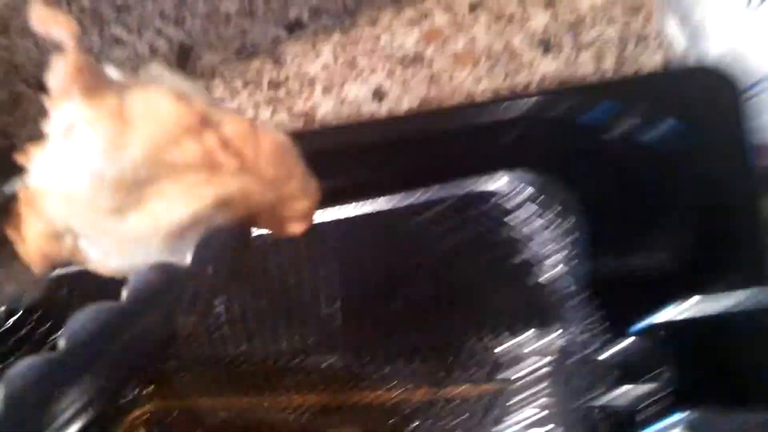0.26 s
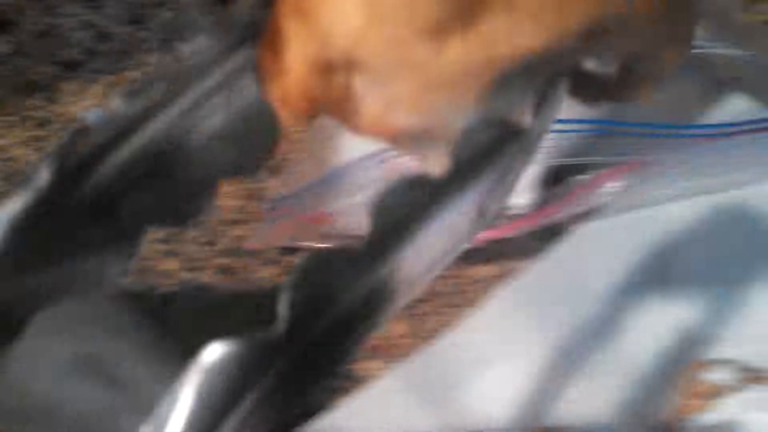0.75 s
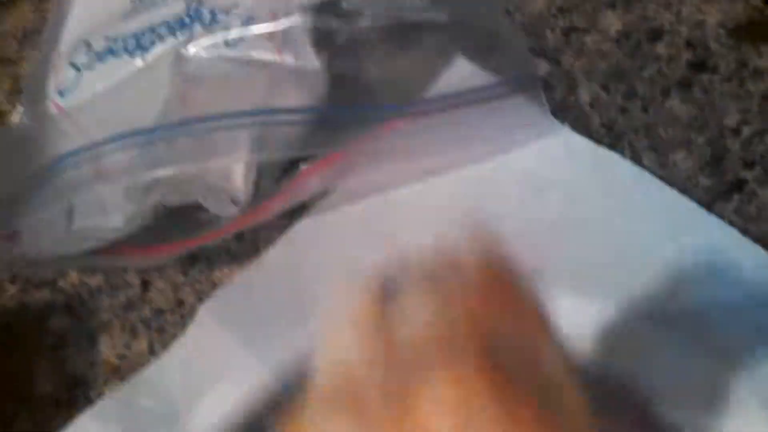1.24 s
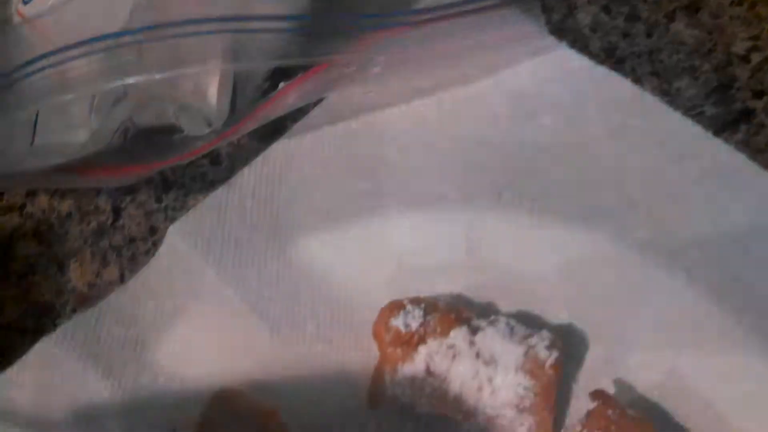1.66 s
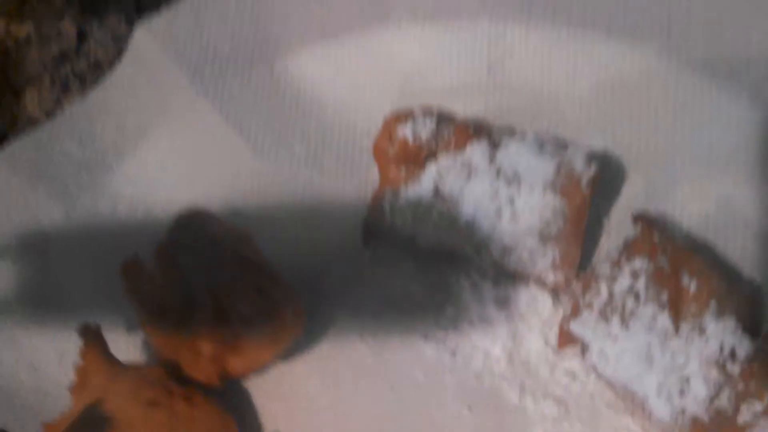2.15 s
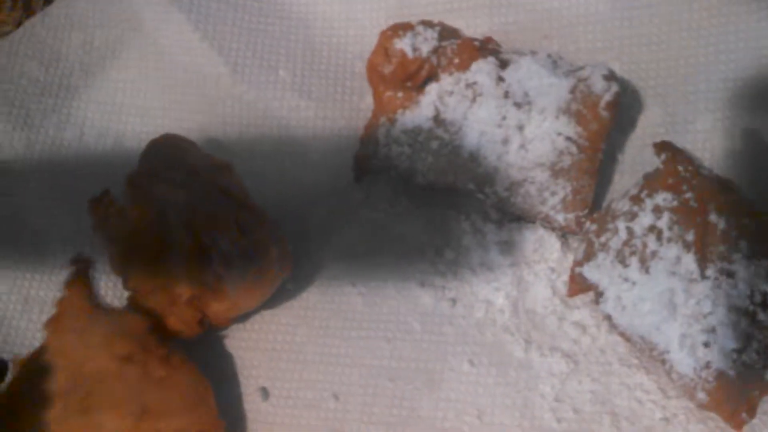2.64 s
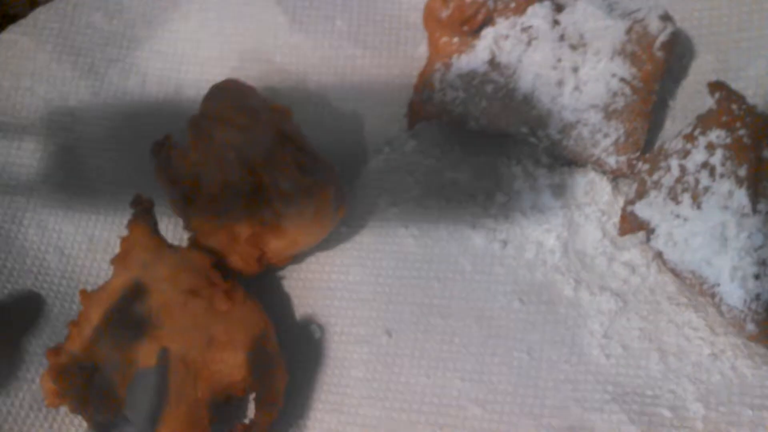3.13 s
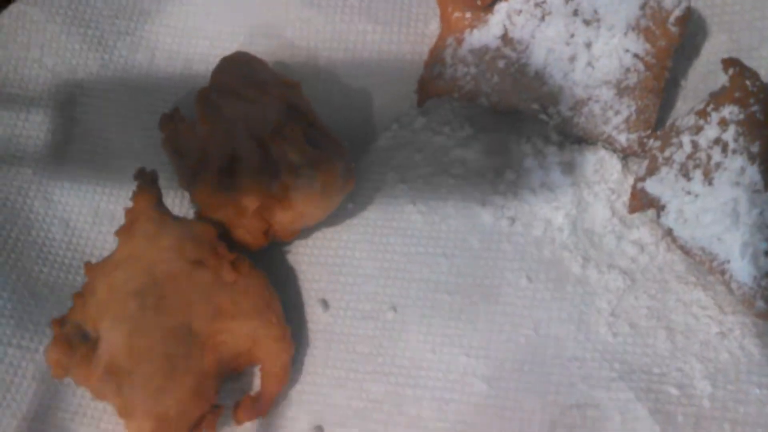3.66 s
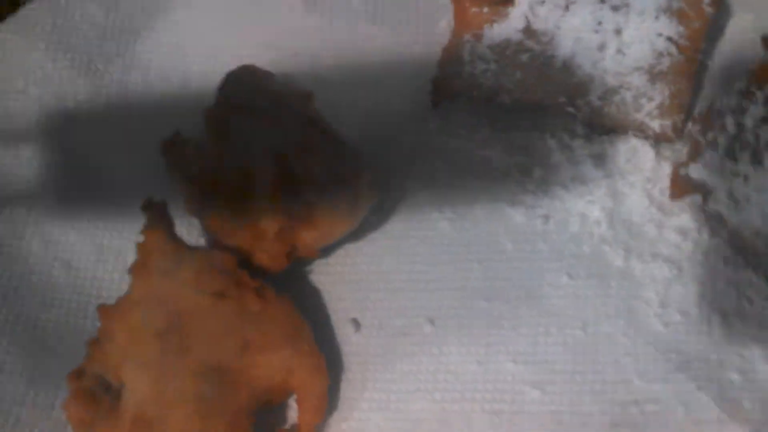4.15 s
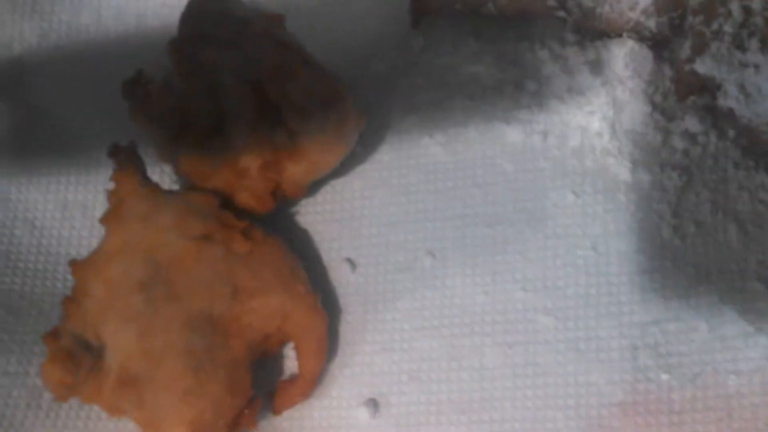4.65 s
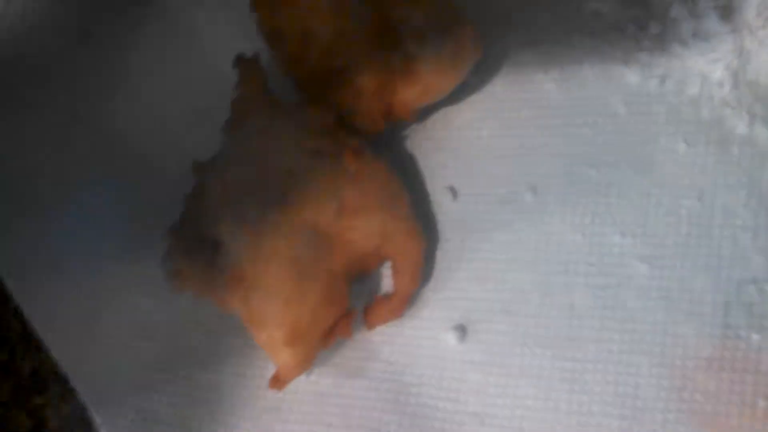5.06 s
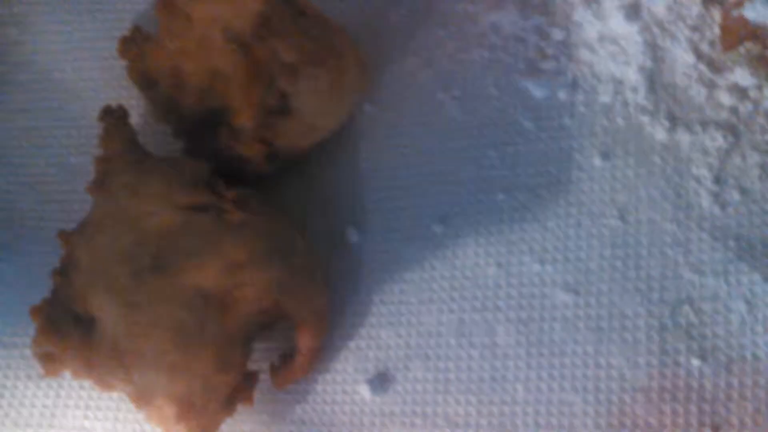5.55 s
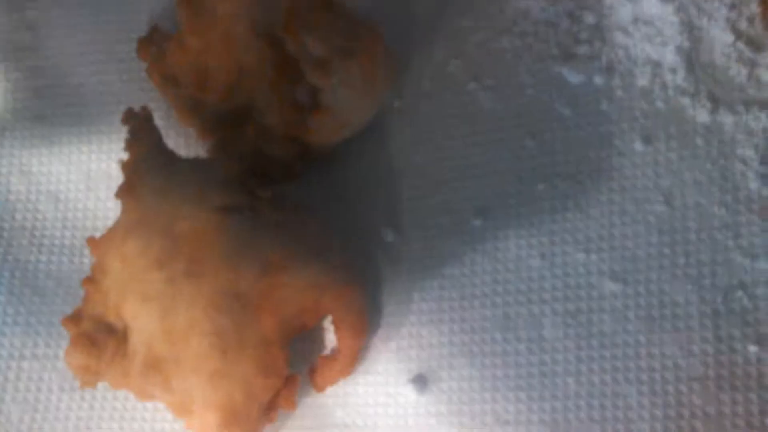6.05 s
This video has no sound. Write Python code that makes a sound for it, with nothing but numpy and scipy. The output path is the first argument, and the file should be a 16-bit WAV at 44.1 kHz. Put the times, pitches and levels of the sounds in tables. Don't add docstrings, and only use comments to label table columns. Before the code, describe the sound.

Metal kitchen tongs tap and scrape lightly on a towel-covered counter, clink sharply three times, then a paper towel rustles and drags in a small kitchen.

```python
import sys
import numpy as np
from scipy import signal
from scipy.fft import rfft, irfft
from scipy.io import wavfile
from scipy.ndimage import uniform_filter1d

SR = 44100
rng = np.random.default_rng(int(sys.argv[2]) if len(sys.argv) > 2 else 0)


def wrap_up_sound(samples):
    columns = np.atleast_2d(samples).T
    tamed = np.clip(columns, -1, 1)
    steps = np.round(tamed * 32767).astype(np.int16)
    wavfile.write(sys.argv[1], SR, steps)


def decibels_to_gain(level_db):
    exponent = np.asarray(level_db, float) / 20
    return 10 ** exponent


N = 277830

# f/Hz, density/dB per Hz
KITCHEN_SPECTRUM = [(25, -118), (55, -65), (75, -69), (150, -69), (260, -74.5), (430, -79), (700, -89),
                    (1200, -95), (2700, -98), (5500, -103), (7500, -105), (15000, -106)]
# t/s, level/dB
BACKGROUND_LIFT = [(0.0, 2.5), (0.77, 4.5), (1.56, 0), (2.02, 4), (2.54, 3.5), (2.808, 2), (3.718, 2.5),
                   (4.35, 5.5), (4.65, 9), (4.91, -1), (5.16, 0.5), (5.51, 6.5), (5.7, 7.5), (5.96, 20),
                   (6.3, 17)]
# f/Hz, correlation/0-1, phase lead/rad
DIFFUSE_LIKENESS = [(50, 0.86, -0.03), (150, 0.9, 0.06), (263, 0.83, -0.12), (440, 0.69, 0.08),
                    (636, 0.61, -0.5), (1050, 0.63, 0.9), (2200, 0, -3.5)]
# f/Hz, t60/s
ROOM_T60 = [(150, 0.71), (1000, 0.28), (3200, 0.42), (5000, 0.46), (8000, 0.36), (12000, 0.2),
            (15000, 0.052)]

# t/s, peak level/dB, f/Hz
FAT_SPITS = [(0.0772, -46, 3660), (0.125, -45, 4590), (0.173, -40, 4930), (0.2887, -33.5, 6800),
             (0.315, -40, 6740), (0.402, -42, 4090), (0.498, -45, 7020), (0.5422, -40.5, 6440),
             (0.599, -34, 7140), (0.6542, -47, 4300), (0.669, -43, 3950), (.681, -42, 5000),
             (.578, -47, 5000), (.065, -44, 9000), (0.721, -40, 3820), (0.7896, -44, 4240),
             (1.1077, -43, 3940), (1.369, -49, 6550), (1.619, -43, 6650)]

# start/s, length/s, level/dB, band start f/Hz, band end f/Hz
SLIDE_EVENTS = [
    (0.849, 0.29, -51.5, 1481, 1457),
    (4.031, 0.087, -51, 1350, 967),
]
# f/Hz, level/dB
SLIDE_SPECTRUM = [(900, 0), (2000, -1.5), (3800, 0), (5000, 0.5), (8000, -4.5), (10000, -11), (15000, -14)]

# t/s, peak level/dB, f/Hz, rise/ms, decay/ms
COUNTER_KNOCKS = [(0.359, -45, 670, 10, 20), (.47, -41, 196, 13, 13), (0.49, -43, 90, 7.6, 9.8),
                  (0.507, -37, 150, 2.9, 6.1), (0.363, -42, 210, 8.5, 23), (1.999, -35, 253, 1.7, 10),
                  (2.681, -33.5, 161, 2.1, 11.5), (4.155, -35.5, 140, 9, 23), (4.114, -36, 209, 6, 16),
                  (4.125, -40, 300, 6, 12), (4.18, -43, 320, 11, 20), (4.2, -41, 150, 8, 15),
                  (4.475, -25, 313, 1, 15.4), (4.72, -34.5, 285, 13, 14), (5.589, -39, 132, 9.8, 21)]
# f/ratio to thud, level/dB, t60/s
COUNTER_MODES = [(.55, -3.5, 0.017), (1.02, 4, 0.012), (1.9, -6, 0.014)]
# t/s, snap level/dB, thud level/dB, snap centre f/Hz,
# thud f/Hz
TIP_TAPS = [(0.3631, -69, -44, 1500, 214), (1.5508, -48, -55.5, 1520, 1000), (1.705, -50, -55, 6860, 440),
            (1.8592, -39, -60, 2920, 310), (1.9108, -43, -48, 2970, 600), (1.9145, -41, -54, 1500, 700),
            (1.951, -41, -56, 7490, 670), (1.9628, -35, -50, 2120, 500), (1.9956, -28.5, -33.5, 1580, 352),
            (2.0111, -32, -35.5, 1530, 486), (2.3555, -39.5, -40.5, 1620, 320),
            (2.3836, -37, -40, 1490, 1074), (2.3838, -43, -70, 7000, 400), (2.483, -42, -70, 9300, 400),
            (2.4032, -35.5, -48, 7000, 370), (2.4837, -46, -58, 4100, 409), (2.494, -41.5, -74, 3420, 229),
            (2.5433, -44, -65, 6700, 253), (2.6275, -43, -44, 1590, 390), (2.681, -30, -47.5, 1570, 160),
            (2.7197, -40.5, -49, 1580, 410), (3.2997, -48, -47, 1970, 338),
            (3.3725, -32.5, -37.5, 1970, 242), (3.4004, -38, -34.5, 2270, 380),
            (3.5801, -37.5, -36.5, 2050, 365), (4.368, -33, -47, 3920, 203),
            (4.7162, -31, -32.5, 1300, 298), (1.894, -39, -56, 1090, 550), (2.3945, -42, -59, 1305, 990),
            (4.3682, -36, -70, 12500, 400), (4.6825, -28, -73, 11500, 400), (2.6812, -31, -70, 7500, 400)]
# t/s, snap level/dB, thud
# level/dB, snap centre f/Hz, thud f/Hz
HARD_TICKS = [(1.9652, -38, -60, 5000, 500), (1.9408, -38, -52, 3000, 700), (1.9215, -42, -56, 3500, 700),
              (1.9108, -36, -70, 2500, 600), (1.8595, -40, -70, 3500, 600), (1.951, -40, -56, 1500, 900),
              (1.982, -41, -56, 1800, 800), (2.5015, -41, -56, 2000, 800), (2.3945, -40, -50, 1200, 990),
              (2.716, -41, -70, 4500, 600), (4.6822, -24, -70, 9500, 600), (4.6845, -25, -70, 12000, 600),
              (4.475, -34, -70, 11000, 600), (5.611, -30, -50, 4000, 900), (5.632, -29, -46, 3000, 900),
              (5.879, -35, -48, 1500, 800), (6.07, -37, -50, 1500, 800), (6.125, -35, -48, 1800, 800),
              (6.152, -37, -50, 1500, 700)]
# t/s, peak level/dB, f/Hz, t60/s
SHORT_PINGS = [(1.712, -44, 1235, 0.32), (1.706, -48, 7100, .05), (1.952, -41, 7500, 0.07),
               (1.951, -51, 9200, 0.03), (1.964, -36, 2100, 0.013), (1.705, -54, 3650, 0.065),
               (2.011, -46, 2730, .015), (2.5, -50, 2150, .06), (2.495, -39, 5600, .04),
               (2.545, -46, 5700, 0.039), (2.66, -54, 3860, 0.1), (2.68, -40, 2220, 0.018),
               (3.3, -43.5, 1970, 0.018), (3.373, -41, 1970, 0.034), (3.1, -50, 1930, 0.033),
               (5.776, -29, 4570, 0.044), (6.189, -27.5, 865, 0.004), (5.5, -43, 810, 0.0092),
               (4.7165, -25.5, 1020, 0.011), (4.7165, -30, 510, 0.014), (4.683, -35, 11800, 0.046),
               (4.683, -33, 9400, .03), (4.683, -54, 9000, .3), (3.7, -30, 10800, .01),
               (4.474, -42, 12200, .02), (4.474, -41, 11500, .02), (4.474, -45, 7050, 0.23),
               (4.474, -40, 4410, .12), (4.116, -38, 12400, .04), (4.116, -39, 13100, .03),
               (2.0015, -36, 500, .012), (4.1335, -22, 225, .04), (4.158, -37, 170, .04),
               (4.472, -30, 110, .05)]

# t/s, snap level/dB, thud level/dB, snap centre f/Hz, thud f/Hz
TOWEL_FOLDS = [(5.466, -52, -54, 1590, 231), (5.5182, -45, -39.5, 1810, 296), (5.5838, -19, -32, 2470, 820),
               (5.6053, -25, -43, 1900, 565), (5.6282, -46, -36.5, 4330, 960),
               (5.6654, -35, -34, 1710, 374), (5.7758, -29, -56, 4600, 984), (5.795, -28, -60, 4600, 900),
               (5.804, -28, -60, 4700, 900), (6.2598, -33, -70, 12500, 600), (6.048, -39, -43, 1500, 800),
               (5.8035, -41, -42, 1530, 1180), (5.9166, -57, -41, 1610, 555), (5.942, -38, -46, 1540, 575),
               (5.983, -24, -45.5, 4140, 1090), (5.9932, -32, -42, 3770, 925), (6.1, -31, -45, 1520, 540),
               (6.1889, -29, -49, 1740, 840), (6.2222, -23, -43.5, 1690, 505),
               (6.2595, -25.5, -43, 1800, 910), (6.2742, -22.5, -42, 6400, 328),
               (5.486, -37, -55, 3520, 600), (6.297, -28.5, -43, 1800, 710),
               (5.7803, -26.5, -47, 4700, 910), (5.7548, -45, -58, 7000, 800), (5.848, -35, -58, 4430, 910),
               (5.898, -41, -44, 4080, 900), (5.472, -44, -68.5, 12500, 600), (5.484, -43, -70, 12500, 600),
               (5.5835, -36, -70, 12600, 600), (5.637, -32, -64, 9030, 600)]
# start/s, length/s, hardest point/share 0-1, body level/dB, fizz over body/dB
TOWEL_STROKES = [(1.701, 0.017, 0.44, -51, 11), (1.71, .09, 0.12, -51, -8), (1.855, 0.071, 0.84, -42, -11),
                 (1.92, 0.15, 0.6, -45, -0.5), (2.353, 0.053, 0.73, -43.5, -4.5),
                 (2.402, 0.066, 0.6, -47.5, -6.5), (2.487, 0.063, 0.09, -43.5, -2),
                 (2.649, 0.054, 0.6, -44, 0), (2.695, 0.073, 0.28, -44, -3), (3.364, 0.02, 0.63, -39.5, -1),
                 (3.399, 0.035, 0, -55.5, 10.5), (3.739, 0.27, 0.65, -50.5, -8),
                 (4.011, 0.14, 0.73, -43, -12.5), (4.371, 0.087, .03, -42.5, -1.5),
                 (5.455, 0.2, 0.38, -41, -5.5), (5.593, 0.055, 0.84, -28.5, -1),
                 (5.581, .014, 0.5, -20, -9.5), (5.645, 0.071, 0.1, -37, -10)]
# t/s, level/dB
TOWEL_DRAG = [(5.7, -80), (5.755, -48.5), (5.778, -32.5), (5.808, -32), (5.82, -38), (5.9, -41.5),
              (6.03, -43), (6.1, -37), (6.25, -43), (6.265, -36), (6.3, -48)]
# f/Hz, level/dB
TOWEL_BODY = [(120, -6), (300, 9.5), (600, 6.5), (1200, 6.5), (2300, -1), (3200, -23)]
# f/Hz, level/dB
TOWEL_FIZZ = [(1500, -48), (2200, 2), (3200, 3), (4500, 0.5), (5200, 4.5), (5800, 2), (8000, 1),
              (15000, -7)]

# t/s, peak level/dB, crack level/dB, crack centre f/Hz, side/factor on capsule lag
ARM_CLINKS = [
    (4.115, -17, -5.5, 4470, 1),
    (4.4722, -8, -11, 2150, 0.81),
    (4.6822, -9.5, -12.5, 4230, 0.94),
]
# f/Hz, level/dB, t60/s
ARM_MODES = [
    [(800, -11, 0.055), (2190, -0.5, 0.039), (3200, -1.5, 0.037), (3660, -1, 0.03), (3940, -0.5, 0.059),
     (4400, 6, 0.026), (4730, -1, 0.036), (4860, -7, .07), (5750, -7, .06), (7130, -2, 0.037),
     (7940, 1, 0.03), (9030, 1, 0.025), (9630, -7, .05), (11600, -4, .03)],
    [(514, -2.5, 0.05), (361, -2, 0.045), (700, 1, 0.057), (1098, 5.5, 0.035), (1260, 0.5, 0.052),
     (1530, -7, 0.093), (2156, 5, 0.075), (3130, -4, 0.059), (3920, -3.5, 0.08), (4190, 0.5, 0.032),
     (4840, -5, 0.12), (6200, -17, 0.04), (7010, -6.5, 0.042), (9220, -10.5, 0.032)],
    [(300, -7, 0.03), (1110, 0.5, 0.013), (2130, -12.5, 0.069), (3190, 7.5, 0.04), (3410, -10, .04),
     (3690, -17, 0.45), (3600, -5.5, 0.03), (4090, -7, 0.02), (5700, -1, 0.042), (4600, -19, .3),
     (6180, -9.5, .08), (6510, -3, 0.025), (7200, -5, 0.043), (8900, -11, 0.056)],
]
# level/dB, centre f/Hz, decay/ms
ARM_SHIVER = [
    (-25, 5000, 30),
    (-29, 6000, 40),
    (-21, 5800, 55),
]

# f/Hz, right capsule lag/rad, right level/dB
PHONE_SHADOW = [(101, -0.39, 4.5), (253, 0.2, 2), (450, 0.78, 4), (660, 1.42, 3.5), (1180, 0.92, -3),
                (1900, 0.21, -7), (2700, -0.41, 9.5), (3990, 0.72, 1), (7500, 0.8, 3), (14500, 0.75, 8.5)]
# f/Hz, level/dB
CAPSULE_RESPONSE = [(20, -21), (45, 0.5), (8200, -3.5), (9400, -11), (10600, -17), (11800, -11.5),
                    (15300, -11.5), (15650, -33), (16700, -48)]
# f/Hz, level/dB
BAND_GATE = [(1000, -30), (2700, -16.5), (5500, -16), (8300, -10), (10500, -3), (14000, -4.5)]


def read(points, hz, column=1):
    table = np.transpose(points)
    return np.interp(np.log(hz + 1), np.log(table[0] + 1), table[column])


def evened(x):
    return x / np.sqrt(np.mean(x ** 2) + 1e-20)


def add(mix, start_s, sound):
    part = mix[round(start_s * SR):][:len(sound)]
    part += sound[:len(part)]


def coloured(x, points):
    return irfft(rfft(x) * decibels_to_gain(read(points, np.fft.rfftfreq(N, 1 / SR))), N)


def snap(hz, ms, width=0.6, rise_ms=0.21, order=1):
    t_s = np.arange(SR // 4) / SR
    f_hz = np.fft.rfftfreq(len(t_s), 1 / SR) + 1
    band = (1 + (np.log2(f_hz / hz) / width) ** 2) ** order
    noise = irfft(rfft(rng.standard_normal(len(t_s))) / band, len(t_s))
    x = noise * np.exp(-t_s * 1000 / ms) * np.minimum(t_s * 1000 / rise_ms, 1)
    return x / abs(x).max()


def ring(modes, split, size=SR // 4):
    t_s = np.arange(size) / SR
    hz, db, t60_s = np.transpose(modes)[:, :, None, None]
    detune = split * np.array([[0], [1], [1]]) * rng.standard_normal((len(modes), 3, 1))
    weaker = decibels_to_gain([[0], [-7], [-7]])
    partials = weaker * decibels_to_gain(db - 60 * t_s / t60_s) * np.sin(2 * np.pi * hz * (1 + detune) * t_s)
    x = partials.sum((0, 1)) * np.minimum(t_s / 0.00081, 1)
    return x / abs(x).max()


def diffuse(pair):
    left, other = rfft(pair, axis=1)
    hz = np.fft.rfftfreq(pair.shape[1], 1 / SR)
    same = np.clip(read(DIFFUSE_LIKENESS, hz), 0, 1)
    turned = np.exp(-1j * read(DIFFUSE_LIKENESS, hz, column=2)) * left
    right = same * turned + np.sqrt(1 - same ** 2) * other
    return irfft(np.array([left, right]), pair.shape[1], axis=1)


def capsules(x, side):
    hz = np.fft.rfftfreq(N, 1 / SR)
    lag = np.exp(-1j * side * read(PHONE_SHADOW, hz))
    shade = decibels_to_gain(read(PHONE_SHADOW, hz, column=2)) * lag
    return np.array([x, irfft(rfft(x) * shade, N)])


def kitchen():
    air = coloured(diffuse(rng.standard_normal((2, N))), KITCHEN_SPECTRUM) * np.sqrt(SR / 2)
    hum = signal.sosfiltfilt(signal.butter(2, 900, fs=SR, output="sos"), air)
    lift_db = np.interp(np.arange(N) / SR, *np.transpose(BACKGROUND_LIFT))
    hum_lift_db = np.minimum(0.97 * lift_db, 4.5)
    return hum * decibels_to_gain(hum_lift_db) + (air - hum) * decibels_to_gain(lift_db)


def room(x):
    echoes = np.zeros((2, SR // 2))
    at = np.arange(100, SR // 2 - 20, 20) + rng.integers(0, 20, (2, (SR // 2 - 101) // 20))
    np.put_along_axis(echoes, at, rng.choice([-1., 1.], at.shape), 1)
    hz, t_s, z = signal.stft(diffuse(echoes), SR, nperseg=256)
    decay = decibels_to_gain(-60 * t_s / read(ROOM_T60, hz)[:, None])
    tail = signal.istft(z * decay, SR, nperseg=256)[1]
    return signal.fftconvolve(x[None], tail / np.linalg.norm(tail[0]), axes=1)[:, :N]


def spitting_fat():
    out = np.zeros(N)
    for s, db, hz in FAT_SPITS:
        add(out, s, decibels_to_gain(db - 1.0) * snap(0.97 * hz, ms=1.0, width=1.0, rise_ms=0.079))
    sizzle_per_s, sizzle_db, fryer_left_s = 42, -42, 1.5
    for when, size, pitch in rng.random((round(sizzle_per_s * fryer_left_s), 3)):
        drop = snap(5000 * (1 + 2 * pitch), ms=0.71, rise_ms=0.1)
        add(out, when * fryer_left_s, size * decibels_to_gain(sizzle_db) * drop)
    return out


def sliding():
    band_db, width_hz, lean = -0.5, 540, 0.58
    out = np.zeros(N)
    hiss = evened(coloured(rng.standard_normal(N), SLIDE_SPECTRUM))
    for start_s, length_s, db, from_hz, to_hz in SLIDE_EVENTS:
        u = np.arange(0, length_s, 1 / SR) / length_s
        r = np.exp(-np.pi * width_hz / SR)
        slow = signal.lfilter([1 - r], [1, -r], rng.standard_normal((len(u), 2)) @ [1, 1j])
        centre_hz = from_hz + (to_hz - from_hz) * u
        band = (slow * np.exp(2j * np.pi * np.cumsum(centre_hz) / SR)).real
        scrape = hiss[round(start_s * SR):][:len(u)] + decibels_to_gain(band_db) * evened(band)
        swell = abs(np.sin(np.pi * u ** lean)) ** 0.81
        add(out, start_s, decibels_to_gain(db) * swell * scrape)
    return out


def knocks():
    out = np.zeros(N)
    for s, db, hz, rise_ms, ms in COUNTER_KNOCKS:
        add(out, s, decibels_to_gain(db + 6.0) * snap(hz, ms, width=0.57, rise_ms=rise_ms, order=2))
    return out


def touches(events, snap_ms):
    out = np.zeros(N)
    for s, snap_db, thud_db, snap_hz, thud_hz in events:
        add(out, s, decibels_to_gain(snap_db + 2) * snap(snap_hz, snap_ms))
        modes = np.multiply(COUNTER_MODES, [thud_hz, 1, 1])
        add(out, s, decibels_to_gain(thud_db + 13.5) * ring(modes, split=0.1, size=SR // 16))
    return out


def pings():
    out = np.zeros(N)
    for s, db, hz, t60_s in SHORT_PINGS:
        add(out, s, decibels_to_gain(db) * ring([(hz, 0, t60_s)], split=0.0116))
    return out


def pressure():
    landing_db, lifting_db, blunt, drag_fizz_db = -7.5, -18, 0.91, -3
    t_s = np.arange(N) / SR
    drag = decibels_to_gain(np.interp(t_s, *np.transpose(TOWEL_DRAG))) * (t_s > TOWEL_DRAG[0][0])
    out = np.array([drag, drag * decibels_to_gain(drag_fizz_db)])
    for start_s, length_s, hardest, db, fizz_db in TOWEL_STROKES:
        u = (t_s - start_s) / length_s
        top = np.clip(hardest, .01, .99)
        rise_db = landing_db * abs(1 - u / top) ** blunt
        fall_db = lifting_db * abs((u - top) / (1 - top)) ** blunt
        ease_db = np.where(u < top, rise_db, fall_db)
        out += decibels_to_gain(db + ease_db) * decibels_to_gain([[0], [fizz_db]]) * (u > 0) * (u < 1)
    return uniform_filter1d(out, size=90, axis=1)


def patchy(x, depth_db):
    z = signal.stft(x, nperseg=256)[2]
    blotches = uniform_filter1d(rng.standard_normal(z.shape), size=6, axis=0)
    blotches = uniform_filter1d(blotches, size=9, axis=1)
    return signal.istft(z * decibels_to_gain(depth_db * evened(blotches)), nperseg=256)[1][:N]


def rubbing():
    out = np.zeros(N)
    layers = ((TOWEL_BODY, 1400, 8.0, -4.5), (TOWEL_FIZZ, 3500, 6, -2.0))
    for level, (colour, per_s, uneven_db, trim_db) in zip(pressure(), layers):
        sizes = decibels_to_gain(uneven_db * np.minimum(rng.exponential(1, N), 3))
        slips = sizes * (rng.random(N) < per_s / SR) * rng.choice([-1, 1], N)
        rustle = evened(patchy(coloured(slips, colour), depth_db=3.8))
        out += rustle * level * decibels_to_gain(trim_db)
    return out


def clinks():
    ring_to_room_db = -2.5
    out = np.zeros((3, N))
    for clink, modes, (shiver_db, shiver_hz, ms) in zip(ARM_CLINKS, ARM_MODES, ARM_SHIVER):
        s, db, crack_db, hz, side = clink
        noisy, tones = np.zeros((2, N))
        clatter = decibels_to_gain(-8.5) * snap(hz, ms=27, width=1.1, rise_ms=2.7, order=2)
        crack = decibels_to_gain(crack_db) * (snap(hz, ms=4.2, width=1.8, order=2) + clatter)
        shiver = decibels_to_gain(shiver_db) * snap(shiver_hz, ms, width=0.8, rise_ms=4, order=2)
        add(noisy, s, decibels_to_gain(db - 2.0) * (crack + shiver))
        add(tones, s, decibels_to_gain(db - 2.0) * ring(modes, split=0.009))
        out[:2] += capsules(noisy + tones, side)
        out[2] += noisy + decibels_to_gain(ring_to_room_db) * tones
    return out


def scene():
    rub = rubbing() + sliding()
    tap = touches(TIP_TAPS, snap_ms=3.6) + touches(TOWEL_FOLDS, snap_ms=1.5)
    tap += touches(HARD_TICKS, snap_ms=1.5) + pings() + knocks() + spitting_fat()
    clink = clinks()
    wet = decibels_to_gain(-8.0) * rub + decibels_to_gain(-10.5) * tap + decibels_to_gain(-8.0) * clink[2]
    return kitchen() + capsules(rub + tap, side=0.79) + clink[:2] + room(wet)


def widened_and_gated(x):
    widen_db, widen_above_hz = 3, 800
    turn = np.array([[1, 1], [1, -1]]) / np.sqrt(2)
    hz, _, z = signal.stft(turn @ x, SR, nperseg=2048)
    z[1, hz > widen_above_hz] *= decibels_to_gain(widen_db)
    power = abs(z) ** 2
    nearby = uniform_filter1d(power.sum(0), size=40, axis=0) * decibels_to_gain(2 * read(BAND_GATE, hz))[:, None]
    middle = np.minimum(np.arange(len(hz)) // 8 * 8 + 4, len(hz) - 1)
    kept = (uniform_filter1d(power, size=8, axis=1) > nearby)[:, middle]
    return turn @ signal.istft(z * kept, SR, nperseg=2048)[1][:, :N]


def band_limit(x):
    return signal.sosfilt(signal.butter(12, 16660, fs=SR, output="sos"), x)


def record(dry):
    delay_samples, right_db = 16, 1.8
    late = np.pad(dry, ((0, 0), (delay_samples, 0)))[::-1, :N]
    lean = decibels_to_gain([[-right_db / 2], [right_db / 2]])
    mix = widened_and_gated(coloured(dry - late, CAPSULE_RESPONSE) * lean)
    return band_limit(mix)


dry = scene()
out = record(dry)
wrap_up_sound(out)
```